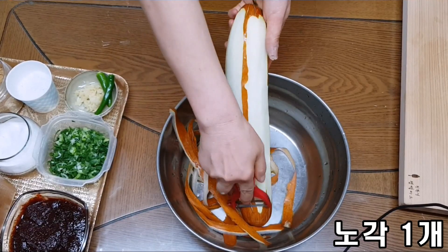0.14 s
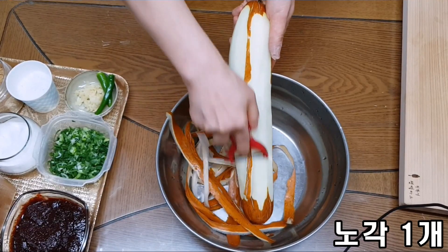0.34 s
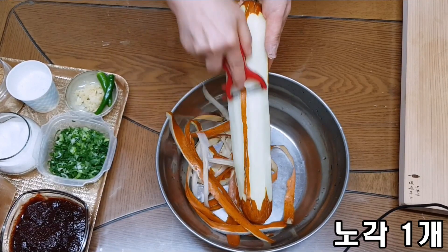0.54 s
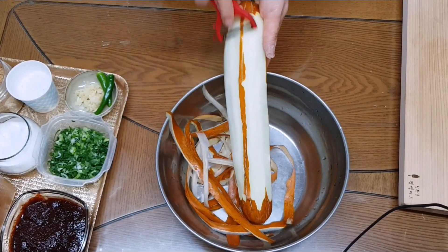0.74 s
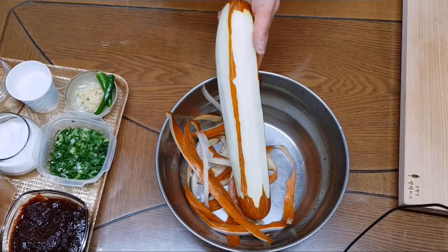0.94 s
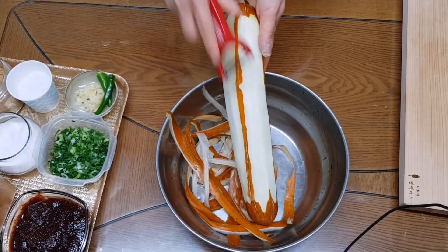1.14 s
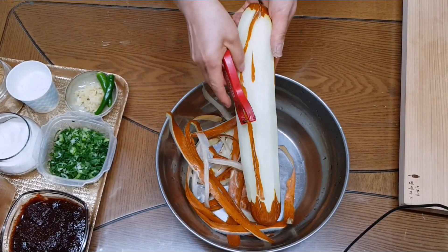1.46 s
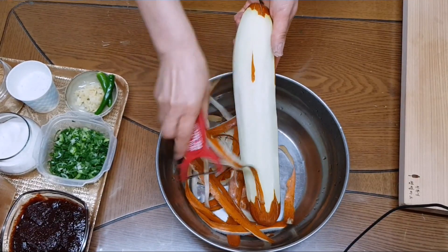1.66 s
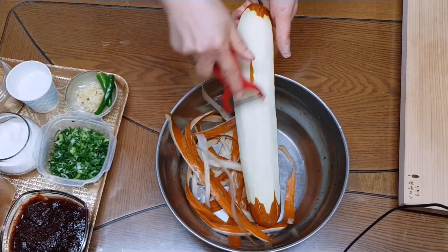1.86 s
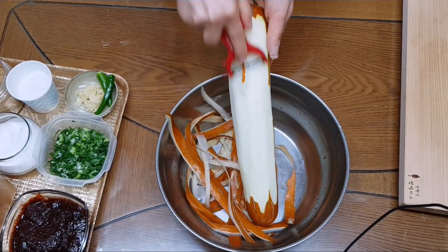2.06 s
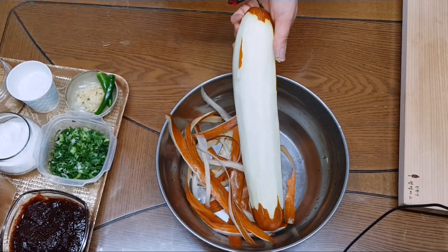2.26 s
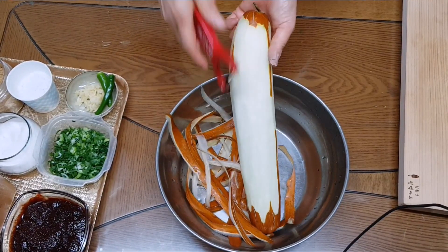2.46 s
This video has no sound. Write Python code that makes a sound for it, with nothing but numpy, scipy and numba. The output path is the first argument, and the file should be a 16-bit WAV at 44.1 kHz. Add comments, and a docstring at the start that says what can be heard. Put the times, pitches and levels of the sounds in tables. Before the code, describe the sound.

A hand peeler shaves two long strips off a cucumber, its loose blade rattling between strokes.

```python
"""A light steel tap, then a wet rasp: a hand peeler shaves two long strips off a big cucumber over a
steel bowl, close by in a kitchen. The blade tears the skin in dense tiny slips that excite the resonances
of flesh and peeler; the loose blade rattles and taps, mostly between strokes. A fridge hums over room
noise and a low rumble. Near the end the sound drops to silence for a moment."""
import sys
import numpy as np
from scipy import signal
from scipy.fft import rfft, irfft
from scipy.io import wavfile
from scipy.ndimage import uniform_filter1d
from numba import njit

SR = 44100
rng = np.random.default_rng(int(sys.argv[2]) if len(sys.argv) > 2 else 0)


def file_out(sig):
    """Save sig as 16-bit WAV at sys.argv[1]."""
    # one column per channel
    cols = np.atleast_2d(sig).T
    # limit, then scale
    lim = np.clip(cols, -1, 1)
    pcm = np.round(lim * 32767).astype(np.int16)
    wavfile.write(sys.argv[1], SR, pcm)


N = 114660

# Modes of the peeler: (frequency [Hz], bandwidth [Hz], relative level [dB])
PEELER_MODES = [(2070, 95, -12.5), (3460, 370, -9.5), (3877, 770, -1.5), (4516, 520, -7.5), (5410, 110, -2),
                (6630, 480, -3.5), (7097, 404, 0), (7670, 570, -9.5)]
# Modes of the cucumber's flesh: (frequency [Hz], bandwidth [Hz], relative level [dB])
FLESH_MODES = [(700, 360, -4.5), (982, 363, 2.5), (1320, 510, -0.5), (1850, 100, -19)]
ANTIPHASE = np.array([[1], [-1]])  # sign of a side signal, left and right


def scrape():
    """Forced vibration: tearing skin drives the modes of flesh and blade, over a rasp and a wet hiss."""
    # Envelopes of the two strokes: (time [s], relative levels of thrum, rasp, ring and hiss [dB])
    strokes = [
        [(0.25, -72, -73, -73, -69), (0.26, -49, -68, -59, -69), (0.27, -51.5, -79, -61, -65),
         (0.284, -46, -60, -55.5, -57.5), (0.34, -48.5, -51, -49.5, -51.5), (0.352, -46.5, -53, -52, -48.5),
         (0.392, -51, -46, -48, -49.5), (0.462, -56.5, -53, -43.5, -47), (0.55, -53, -54.5, -51.5, -49),
         (0.606, -55.5, -61, -50.5, -51.5), (0.658, -49.5, -53, -53, -51), (0.674, -47, -57.5, -48, -48),
         (0.724, -48, -55, -52, -50), (0.772, -52, -56, -50, -51), (0.786, -56, -59.5, -55, -50.5),
         (0.89, -59, -60.5, -57, -59.5), (0.95, -71, -97, -79, -73)],
        [(2.02, -55, -69.5, -77, -53.5), (2.036, -57.5, -71, -67, -60), (2.068, -57, -64, -57.5, -60),
         (2.09, -53, -61.5, -52.5, -54), (2.132, -53, -51.5, -50.5, -51), (2.138, -55.5, -55, -48, -49.5),
         (2.178, -52.5, -57.5, -50.5, -55.5), (2.218, -51.5, -61, -49, -51.5), (2.228, -58.5, -56, -47, -45),
         (2.238, -56, -58, -49.5, -50.5), (2.266, -55, -57, -49.5, -53.5), (2.278, -47, -56, -45, -46),
         (2.288, -50.5, -51, -44.5, -42), (2.326, -62, -73, -61.5, -62.5), (2.36, -71, -75, -74, -66)],
    ]
    # Spectrum of the wet hiss: (frequency [Hz], relative level [dB])
    hiss_spectrum = [(2650, -17), (4500, -7.5), (5170, -9), (6080, -2.5), (7130, -1), (7950, -3.5),
                     (9330, -1), (11200, -3), (13800, -5), (15500, -12.5)]
    thrum = undb(-6.5) * ringing(FLESH_MODES) + undb(-5) * rasp(780, 1800)
    ring = undb(-13.5) * ringing(PEELER_MODES) + undb(-5) * rasp(3710, 2200)
    return (envelope(strokes, 1) * thrum * undb(2.05 * walk(40.1))
            + envelope(strokes, 2) * undb(-2.5) * rasp(2000, 1700)
            + envelope(strokes, 3) * ring
            + envelope(strokes, 4) * colour(streaks(), hiss_spectrum) * undb(1.9 * walk(40)))


def slips(per_s=12000, scatter_db=0.5):
    """Stick-slip friction as shot noise: dense impulses of random time and uneven size."""
    impulses = (rng.random(N) < per_s / SR) * rng.standard_normal(N)
    return unit(impulses * undb(scatter_db * rng.standard_exponential(N)))


def rasp(hz, width):
    """Resonant filtering: one band of slip noise, at unit RMS."""
    return unit(steep_band(slips(), hz, width))


def ringing(modes):
    """Modal superposition: slips drive each mode, which flickers in level and frequency."""
    out = 0
    for hz, width, db in modes:
        amplitude = undb(db + 7 * walk(25.04)) * np.sqrt(width)
        out += amplitude * unit(steep_band(slips(), hz * (1 + 0.083 * walk(15)), width))
    return unit(out)


def streaks():
    """Independent modulation: narrow neighbouring bands of slips each drift, swell and fade."""
    return sum(undb(3 * walk(22)) * steep_band(slips(), hz * (1 + .035 * walk(14)), hz / 7)
               for hz in np.geomspace(2500, 14800, num=18))


def taps():
    """Impact excitation: the loose blade's tick and dying rattle ring each mode by a random amount."""
    # Blade impacts: (time [s], relative level [dB], thud gain [dB], sizzle gain [dB],
    # rattle decay time [ms], tick re rattle [dB], prominent ring [Hz])
    impacts = [(0.0064, -43, -16, -32, 7.2, 11.5, 2900), (0.0622, -55.5, 8, -26, 2.5, 2, 2220),
               (0.096, -53, -10, -33, 15, 4, 3640), (0.2054, -35.5, -7.5, -10, 3.7, 7, 7100),
               (0.2577, -47.5, 3, -22, 3.7, 5, 3800), (0.997, -34.5, -10, -10, 2.5, 6, 3930),
               (1.0057, -32.5, -16.5, -8, 6.4, -1, 3890), (1.01, -35, -9.5, -3.5, 6.4, 2, 4000),
               (1.06, -37, -23, -13, 3.9, 0, 6800), (1.16, -47.5, -11.5, -28, 9.6, 4, 3550),
               (1.1842, -49.5, -9.5, -23, 8.6, 2, 3930), (1.2186, -43.5, -13, -8.5, 5.6, 0, 7100),
               (1.2974, -53, -28, -22, 7, -8, 6800), (1.3257, -39, -14.5, -42, 3.9, -14, 6960),
               (1.3322, -39.5, -12.5, -5, 5.9, -15, 4610), (1.423, -50, -19, -14, 12, -6, 4700),
               (1.493, -53.5, -28, -17, 5.8, 0, 4960), (1.6094, -35, -23, -13.5, 6.8, 2, 7370),
               (1.622, -45, -28, -4, 4.3, -6, 4770), (1.66, -36.5, -14.5, -9, 7.6, -3, 6880),
               (1.673, -42, -23, -12, 6.2, -8, 3650), (1.719, -36.5, -18.5, -18.5, 4.5, -3, 6920),
               (1.728, -47, -28, -8, 10, -8, 4740), (1.744, -40.5, -14, -6, 5.6, -5.5, 3300),
               (1.7796, -45, 3, -23, 6, 6, 3200), (1.815, -49, -4, -9.5, 7.1, 2, 6300),
               (1.9311, -46.5, -6.5, -24, 7.3, 5, 6540), (1.9436, -43, -16, -11, 5.3, 3.5, 6500),
               (1.9721, -37, -8, -5, 2.3, 3.5, 5070), (1.98, -43.5, -3, -8.5, 5.9, -1, 7000),
               (1.9898, -28.5, -3.5, -7.5, 3.1, 2.5, 6920), (2.2258, -31, -17, -20, 2.9, 3, 6560),
               (2.2801, -29.5, -22.5, -32, 5.1, 4.5, 6000), (2.2866, -32.5, -27.5, -24, 3, -2, 3670),
               (2.3002, -41.5, -31.5, -22, 7.8, 1.5, 4130), (2.452, -50, -10, -24.5, 5.4, 8, 7520)]
    # Longer rings of the steel bowl: (frequency [Hz], bandwidth [Hz], relative level [dB])
    steel_modes = [(2234, 69, -18), (4870, 62, -20), (7470, 120, -24.5)]
    # High resonances heard as sizzle: (frequency [Hz], bandwidth [Hz], relative level [dB])
    sizzle_modes = [(8200, 530, 14), (9700, 2100, 12), (11130, 1400, 6), (13560, 2000, 3)]
    size = 8192
    out, ms = np.zeros(N + size), np.arange(size) * 1000 / SR

    def pulse(rise_ms, decay_ms):
        return np.minimum(ms / rise_ms, 1) * np.exp(-ms / decay_ms)

    def scattered(db):
        return undb(db + 3.5 * rng.standard_normal())

    def struck(force, modes):
        response = 0
        for hz, width, db in modes:
            mode = scattered(db) * band(force, hz, 1.45 * width)
            detuned_hz = hz * (1 + 0.028 * rng.standard_normal())
            response += band(mode, detuned_hz, width)
        return unit_burst(response)

    for start, level_db, thud_db, sizzle_db, rattle_ms, tick_db, ring_hz in impacts:
        contact = pulse(1.16, rattle_ms) + undb(tick_db) * pulse(0.26, 0.62)
        force, wet = rng.standard_normal((2, size)) * contact
        tail = undb(-3) * pulse(3, 37) * steep_band(rng.standard_normal(size), 6100, 9000)
        snap = undb(-15.5) * unit_burst(steep_band(wet, 8500, 13000) + tail)
        bright_noise = unit_burst(steep_band(rng.standard_normal(size), 11000, 9000))
        fizz = undb(sizzle_db - 11.5) * pulse(3, 38) * bright_noise
        steel = sum(scattered(db) * unit_burst(band(force, hz, width)) for hz, width, db in steel_modes)
        peeler = struck(force, PEELER_MODES + [(ring_hz, 260, 5)])
        thud = undb(thud_db + 3.5) * struck(force, FLESH_MODES)
        sizzle = undb(sizzle_db + 3) * struck(force, sizzle_modes)
        i = int(start * SR)
        out[i:i + size] += undb(level_db - 6.5) * (snap + fizz + steel + peeler + thud + sizzle)
    return out[:N]


def rubs():
    """Friction-driven resonance: blade or finger drags on the flesh, sounding one narrow gliding band."""
    # Drags on the flesh: (start [s], duration [s], level [dB], frequency [Hz], glide over the rub [%])
    drags = [(0.256, 0.055, -49.5, 1077, -6.5), (0.344, 0.037, -49, 3285, 0.5), (0.353, 0.04, -48, 3640, 0),
             (0.364, 0.13, -47, 606, 9), (0.369, 0.16, -53, 1245, 0), (0.376, 0.13, -55.5, 2220, -6),
             (0.385, 0.065, -48.5, 3090, 6), (0.366, 0.1, -50, 2710, 5.5), (0.412, 0.093, -53.5, 332, 3),
             (0.417, 0.12, -52.5, 1547, -0.5), (0.439, 0.075, -48.5, 3820, -2),
             (0.447, 0.12, -54, 647, 3.5), (0.468, 0.049, -50, 3496, -7.5), (0.489, 0.09, -52.5, 1018, 4),
             (0.512, 0.06, -62, 4430, 1), (.52, 0.16, -57, 4130, -7), (.54, 0.12, -56, 3600, -2.5),
             (0.525, 0.11, -60, 2240, -8), (0.666, 0.05, -52.5, 3810, -3), (0.659, 0.038, -55, 1950, 0),
             (0.688, 0.11, -55, 970, 15), (0.65, 0.1, -56.5, 3114, -9), (0.724, 0.082, -57, 1620, -1),
             (.81, 0.083, -61, 893, 2), (1.368, 0.066, -64.5, 980, 6), (1.792, 0.085, -61.5, 775, 3),
             (1.829, 0.065, -72, 2350, -16.5), (2.047, 0.061, -57.5, 950, 3),
             (2.048, 0.047, -62.5, 2200, -3), (2.076, 0.065, -59, 4300, 2.5),
             (2.091, 0.074, -54.5, 1050, 4), (2.084, 0.076, -57, 3140, 0), (2.176, 0.063, -56, 4000, 1)]
    t, out = np.arange(N) / SR, 0
    throb = undb(1.1 * walk(90))
    for start, duration, db, hz, glide in drags:
        progress = np.clip((t - start) / duration, 0, 1)
        pitch = hz * (1 + 0.014 * walk(29.95) + glide / 100 * (progress - .5))
        swell = np.sin(np.pi * progress) ** 0.38
        out += undb(db) * swell * rasp(pitch, width=123 + 0.02 * hz)
    return throb * out


def brush():
    """Sliding friction: blade and peel brush lightly between strokes, with a fluttering level."""
    # Envelopes of the light contacts: (time [s], level [dB])
    contacts = [
        [(0, -64), (.03, -72), (.07, -78), (.19, -103), (.21, -65), (.25, -63)],
        [(.95, -77), (.99, -55), (1.02, -57), (1.045, -56), (1.09, -61), (1.12, -81), (1.155, -68), (1.19, -67),
         (1.21, -73), (1.25, -71), (1.32, -71), (1.345, -65), (1.41, -73), (1.6, -74.5), (1.625, -66),
         (1.655, -67), (1.71, -58.5), (1.755, -62), (1.80, -66.5), (1.86, -66), (1.87, -91), (1.925, -87.5),
         (1.935, -65.5), (1.99, -63), (2.0, -54), (2.04, -65)],
        [(2.3, -59), (2.36, -70), (2.43, -70.5), (2.48, -78)],
        [(2.57, -66.5), (2.6, -67.5)],
    ]
    # Spectrum of the brushing: (frequency [Hz], relative level [dB])
    spectrum = [(880, -47), (1500, 2.5), (1990, -3), (3950, 6), (5450, -1), (7230, 6), (14100, -13.5),
                (15100, -26.5), (15500, -42)]
    return envelope(contacts) * colour(slips(), spectrum) * undb(5.8 * walk(49.89))


def reflections(direct, mid_t60_s=0.17, side_t60_s=0.16):
    """Diffuse reverberation: convolution with exponentially decaying noise, as mid and side signals."""
    # Colouring of the side reflections: (frequency [Hz], relative gain [dB])
    side_spectrum = [(100, 6.5), (400, -2.5), (1300, 3), (2500, 4), (5000, 1.5), (9000, 5.5), (15000, 5.5)]
    t = np.arange(int(.4 * SR)) / SR
    decay = undb(-60 * t / [[mid_t60_s], [side_t60_s]]) * (t > .002)
    tails = rng.standard_normal((2, len(t))) * decay
    mid, side = (signal.fftconvolve(direct, tail / np.linalg.norm(tail))[:N] for tail in tails)
    return undb(-10) * mid + undb(-18) * equalise(side, side_spectrum) * ANTIPHASE


def fridge():
    """Additive hum: steady partials with slight random modulation of amplitude and phase."""
    # Partials of the hum: (frequency [Hz], RMS level [dB])
    partials = [(59.5, -85.5), (119, -74), (241, -76.5), (360.5, -72.5), (409, -74.5), (436, -75.5)]
    t, hum = np.arange(N) / SR, 0
    for hz, db in partials:
        amplitude = np.sqrt(2) * undb(db + 4.05 * walk(9.93))
        phase = 2 * np.pi * (hz * t + rng.random()) + 2.16 * walk(18)
        hum += amplitude * np.sin(phase)
    return hum


def rumble():
    """Structure-borne sound: low noise carried through hand and table."""
    # Envelope of the rumble: (time [s], relative level [dB])
    levels = [(0.0, -80), (0.16, -86), (0.22, -59), (0.27, -70), (0.3, -49.5), (0.8, -79), (0.82, -64),
              (1.41, -81), (1.49, -69), (1.98, -81), (2.22, -71), (2.25, -53), (2.48, -69.5), (2.52, -101),
              (2.58, -62), (2.6, -63)]
    return envelope([levels]) * undb(-5.5) * unit(steep_band(rng.standard_normal(N), 90, 160))


def kitchen():
    """Partly coherent background: room noise, hum and rumble, nearly alike left and right."""
    # Spectrum of the room noise: (frequency [Hz], relative level [dB])
    spectrum = [(15, -35.5), (25, -12.5), (370, -0.5), (1300, -10), (1880, -24.5), (2190, -11.5),
                (2440, -23.5), (4330, -25), (4810, -22.5), (5780, -25.5), (6940, -28.5), (13000, -55.5)]
    mid, side = (colour(rng.standard_normal(N), spectrum) for _ in range(2))
    side = undb(-13.5) * (side + 2.5 * band(side, 8500, 9000))  # wider in the treble
    low = fridge() + rumble()
    low_side = undb(-19) * np.roll(low, N // 2)  # a time shift decorrelates it
    room_gain = undb(-64 + 0.27 * walk(8.8))
    return room_gain * (mid + side * ANTIPHASE) + low + low_side * ANTIPHASE


def undb(db):
    """Amplitude ratio of a level in decibels."""
    return 10 ** (np.asarray(db) / 20)


def unit(x):
    """Normalisation to unit RMS."""
    return x / np.sqrt(np.mean(x ** 2))


def unit_burst(x):
    """Normalisation to unit RMS over the loudest 2 ms."""
    return x / np.sqrt(uniform_filter1d(x ** 2, size=88).max())


@njit
def svf(x, hz, width):
    """State-variable resonator: a band-pass with unit gain at its moving centre."""
    y, band_state, low_state = np.empty(len(x)), 0., 0.
    for i in range(len(x)):
        g, damping = np.tan(np.pi * hz[i] / SR), width / hz[i]
        v = (band_state + g * (x[i] - low_state)) / (1 + g * (g + damping))
        band_state, low_state = 2 * v - band_state, low_state + 2 * g * v
        y[i] = damping * v
    return y


def band(x, hz, width):
    """Second-order resonance with a steady or moving centre; width in Hz."""
    return svf(x, np.ones(len(x)) * hz, float(width))


def steep_band(x, hz, width):
    """Two equal resonances in cascade, for steeper skirts."""
    return band(band(x, hz, width), hz, width)


def walk(rate):
    """Low-pass random modulation: values held for 1 / rate seconds and smoothed twice."""
    hold = int(SR / rate)
    steps = np.repeat(rng.standard_normal(N // hold + 1), hold)
    return 0.9 * uniform_filter1d(uniform_filter1d(steps, hold), hold)[:N]


def equalise(x, points, below_db=None):
    """Spectral weighting by (frequency [Hz], gain [dB]) points, joined over log frequency."""
    bin_hz = np.arange(N // 2 + 1) * SR / N + 1
    hz, db = np.array(points).T
    return irfft(rfft(x) * undb(np.interp(np.log(bin_hz), np.log(hz), db, left=below_db)), N)


def colour(x, points):
    """Spectral shaping to unit RMS, with the bass below the first point suppressed."""
    return unit(equalise(x, points, below_db=-60))


def envelope(curves, column=1):
    """Amplitude envelope from one level column of several time curves; silent outside them."""
    t, db = np.arange(N) / SR, np.full(N, -200.)
    for rows in map(np.array, curves):
        inside = (t >= rows[0, 0]) & (t <= rows[-1, 0])
        db[inside] = np.interp(t[inside], rows[:, 0], rows[:, column])
    return uniform_filter1d(undb(db), size=200)


def scene():
    """Superposition of the direct peeling sound, its reflections and the kitchen background."""
    direct = scrape() + brush() + rubs() + taps()
    return direct + reflections(direct) + kitchen()


def record(dry, cut_s=2.481, back_s=2.571, top_hz=15200):
    """Gating and band limiting: a brief drop to silence, then a steep low-pass."""
    t = np.arange(N) / SR
    gate = np.ones(N)
    gap = (t >= cut_s) & (t <= back_s)
    gate[gap] = undb(-15 - 1130 * (t[gap] - cut_s))
    low_pass = signal.ellip(8, .2, 70, top_hz, fs=SR, output="sos")
    return signal.sosfilt(low_pass, dry * gate)


dry = scene()
out = record(dry)
file_out(out)
```